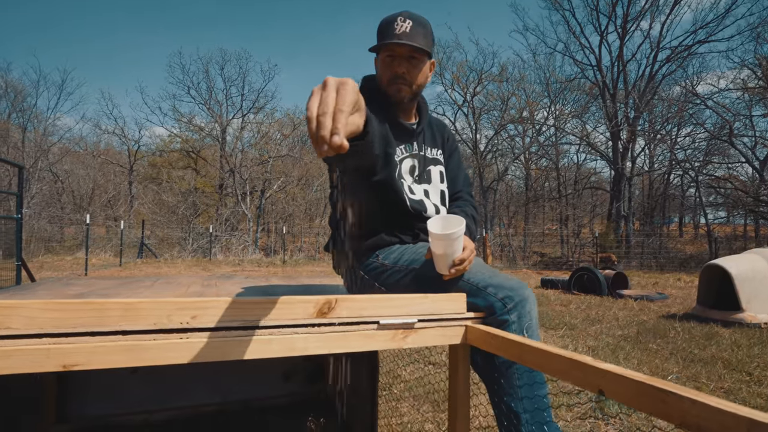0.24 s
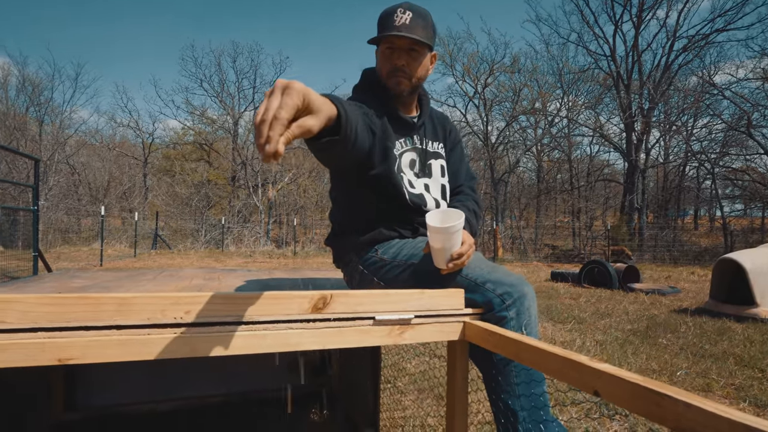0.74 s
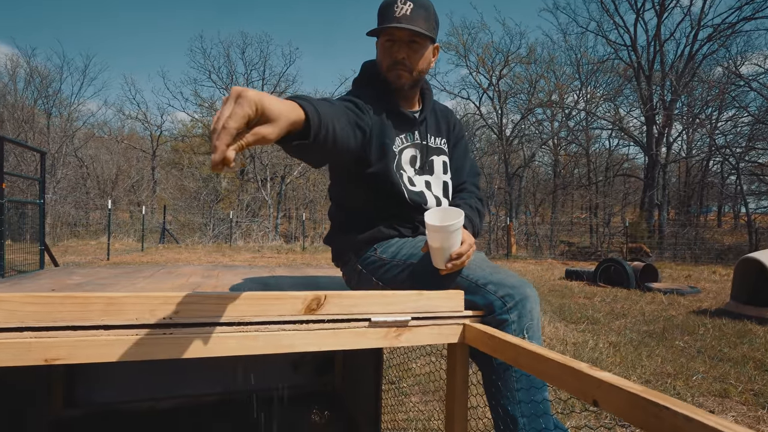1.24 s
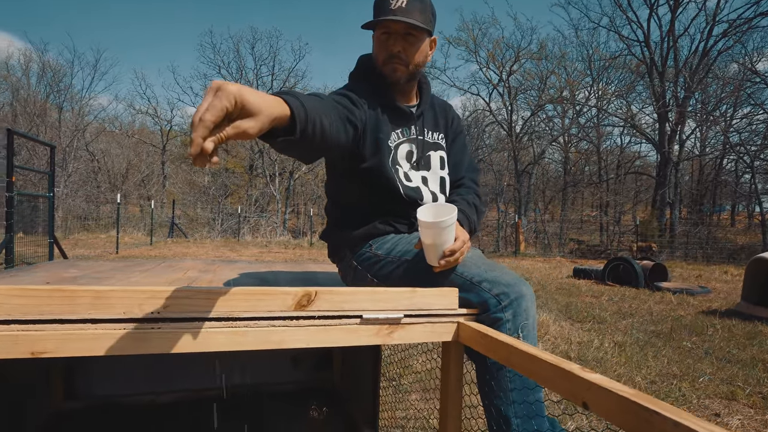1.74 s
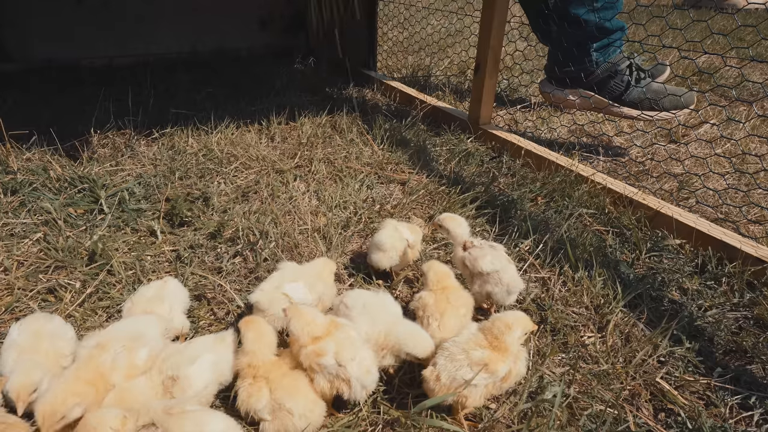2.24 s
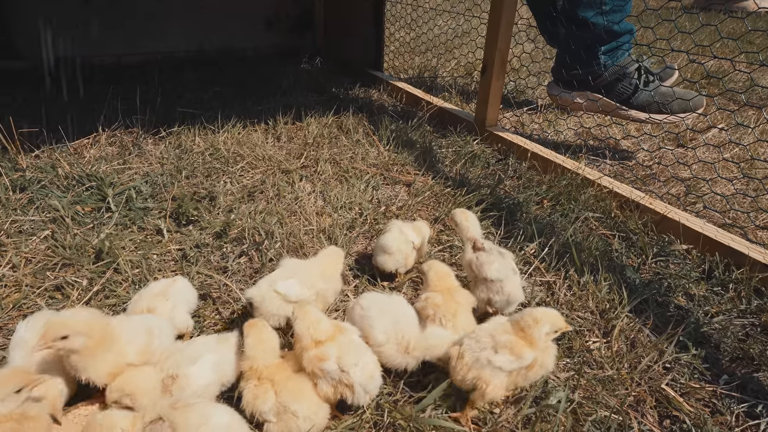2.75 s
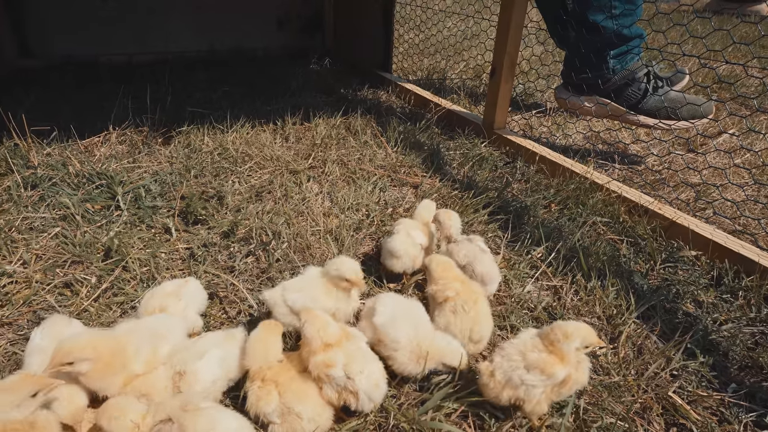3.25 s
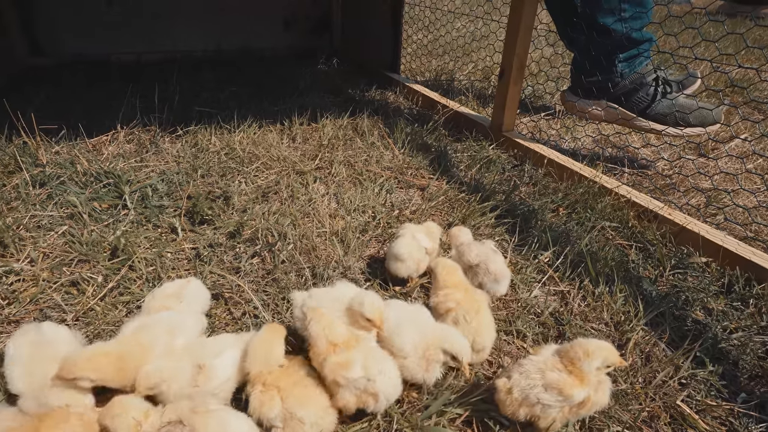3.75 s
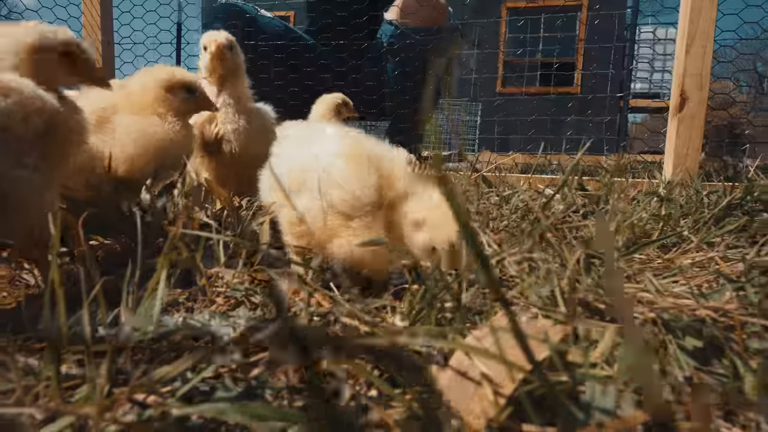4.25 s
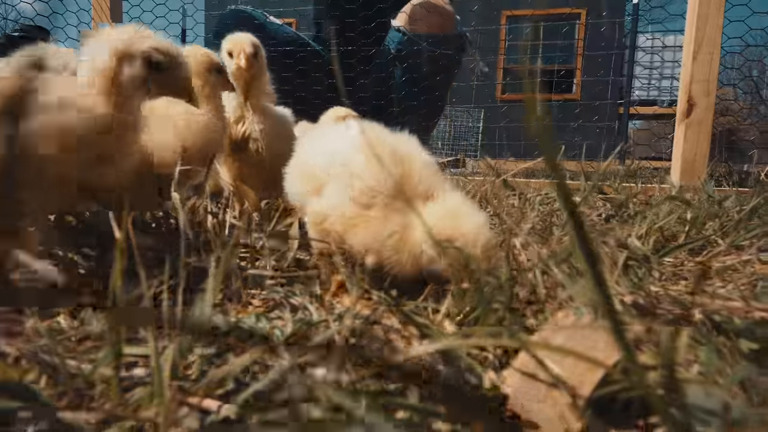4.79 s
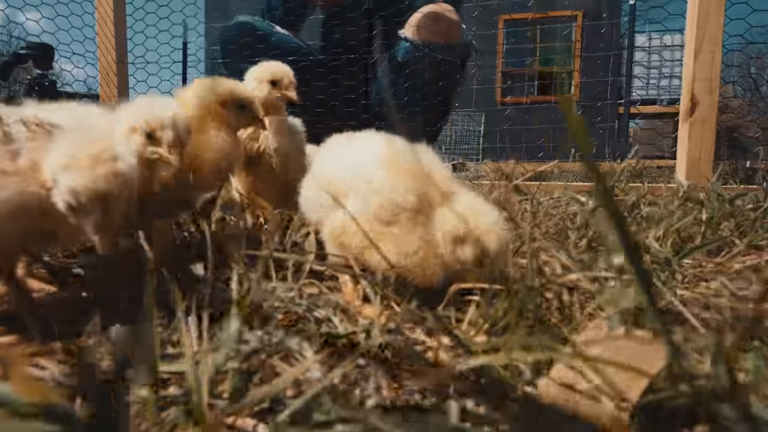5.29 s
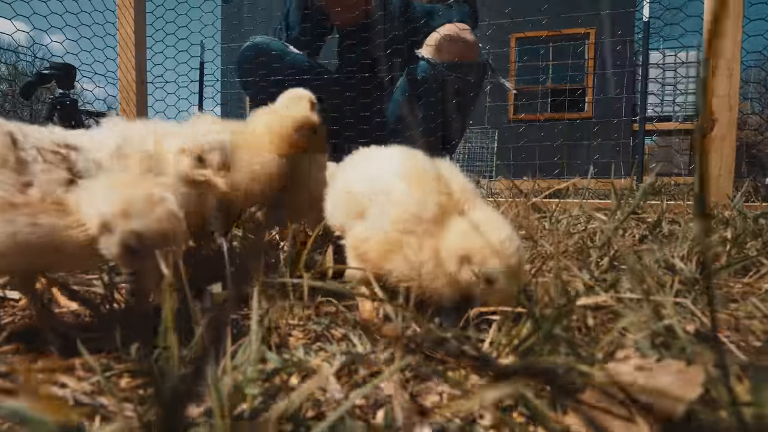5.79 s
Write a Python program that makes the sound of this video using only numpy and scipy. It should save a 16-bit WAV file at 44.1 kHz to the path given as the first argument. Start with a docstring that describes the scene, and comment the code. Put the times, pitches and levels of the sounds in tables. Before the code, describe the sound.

Outdoors, in one channel, low wind sways and buffets the microphone over soft open-air hiss and faint dry-grass rustle. From 0 to 2 s, chicks call quietly and sparsely, with very short, nearly pure whistles around 2.5 to 4 kHz; tiny feed grains ping off the pen, and a dull bump comes near 0.15 s. Thin, distant bird whistles waver faintly between about 1.8 and 3.9 s. A low click falls near 2.26 s, then wind swells until 3 s as louder cheeps overlap, sliding downward among arched peeps. More grains tick, the brightest near 3.4 s, with a small bump. Wind rises again around 3.6 s. A brief gritty hiss swells at 3.84 s and stops abruptly at 3.97 s. Afterward the wind mostly eases, peeps are close and strong, and grass rustles nearer, with dry pecks and stalk snaps thickest around 5.45 to 5.9 s. Peeping continues almost to the end at about 6 s.

```python
"""Chicks peep and wind buffets the microphone from the outset, over dry grass that rustles underfoot.
Each call is a nearly pure whistle, from a model of the syrinx, that arches or slides down in pitch.
Feed grains ping off the pen as decaying modes, among damped bumps and one low click; a whistle wavers far off.
A short rush of shaped noise leads to close pecks and snapping stalks, made of very brief noise bursts."""
import sys
import numpy as np
from scipy import signal
from scipy.fft import rfft, irfft, next_fast_len
from scipy.io import wavfile
from scipy.ndimage import uniform_filter1d

SR = 44100
rng = np.random.default_rng(int(sys.argv[2]) if len(sys.argv) > 2 else 0)


def put_to_file(sound):
    """Save the sound as 16-bit audio at rate SR, in the file named by the first command-line argument."""
    columns = np.atleast_2d(sound).T  # one column per channel
    safe = np.clip(columns, -1, 1)
    whole_steps = np.round(safe * 32767)
    wavfile.write(sys.argv[1], SR, whole_steps.astype(np.int16))


N = 265614  # length in samples
TIME = np.arange(N) / SR


def undb(db):
    """Logarithmic level: decibels become an amplitude ratio."""
    return 10 ** (np.asarray(db) / 20)


def unit(x):
    """Normalisation by effective value: scale to rms 1."""
    return x / np.sqrt(np.mean(x ** 2))


def curve(points):
    """Linear interpolation: (s, value) points joined by straight lines in time."""
    return np.interp(TIME, *np.transpose(points))


def colour(x, points):
    """Spectral shaping: weight the spectrum of x by (Hz, dB) points on a log frequency axis, at rms 1."""
    hz, db = np.transpose(points)
    size = next_fast_len(len(x))
    bins = np.maximum(np.fft.rfftfreq(size, 1 / SR), 1)
    gain = undb(np.interp(np.log(bins), np.log(hz), db))
    return unit(irfft(rfft(x, size) * gain, size)[:len(x)])


def band(x, lo_hz, hi_hz):
    """Band limitation: a causal Butterworth band-pass."""
    b, a = signal.butter(2, [lo_hz, hi_hz], "band", fs=SR)
    return signal.lfilter(b, a, x)


def walk(size, rate):
    """Random modulation: chance values, drawn rate times a second, smoothed to a spread a little below 1."""
    hold = max(int(SR / rate), 1)
    steps = np.repeat(rng.standard_normal(size // hold + 1), hold)
    return uniform_filter1d(uniform_filter1d(steps, hold), hold)[:size]


def add(out, start, x):
    """Superposition: mix x into out from start seconds on."""
    i = int(start * SR)
    out[i:i + len(x)] += x[:N - i]


def span(length_s):
    """Sampling: the sample times of one call, in seconds from its start."""
    return np.arange(0, length_s, 1 / SR)


def crackle(rate, smear_s, spread_db):
    """Impulsive noise: tiny cracks of very unequal size, in flurries, each a decaying burst of noise."""
    sizes = undb(spread_db * np.minimum(rng.standard_exponential(N), 4))
    chance = rate / SR * undb(4 * walk(N, 25))  # the flurries
    cracks = (rng.random(N) < chance) * sizes
    envelope = signal.lfilter([1], [1, -np.exp(-1 / (smear_s * SR))], cracks)
    return envelope * rng.standard_normal(N)


def ring(t, hz, t60):
    """Damped vibration: one struck mode that falls by 60 dB in t60 seconds."""
    return np.cos(2 * np.pi * hz * t) * np.exp(-np.log(1000) * t / t60)


# relative strength of the wind on the microphone: start_s [s], level_db [dB]
WIND_STRENGTH = [(0, -34.5), (0.4, -45), (0.72, -40.5), (1.45, -39.5), (1.6, -41), (2.22, -44),
                 (2.3, -31.5), (2.9, -30.5), (3.1, -39.5), (3.45, -41), (3.55, -30.5), (3.96, -29),
                 (4.04, -33.5), (4.25, -47.5), (4.75, -41.5), (5.35, -51.5), (5.7, -44.5), (5.85, -34.5)]
# spectrum of the slow sway: frequency_hz [Hz], level_db [dB]
SWAY_SPECTRUM = [(3, -10.5), (9, 6), (14, 3.5), (25, -10), (45, -16.5), (70, -35), (140, -66), (3000, -110)]
# spectrum of the gusts' buffeting: frequency_hz [Hz], level_db [dB]
BUFFET_SPECTRUM = [(25, -15), (55, 4.5), (80, 1.5), (125, -5.5), (200, -9), (320, -24.5), (700, -32),
                   (2000, -46), (10000, -82)]
# spectrum of the open air: frequency_hz [Hz], level_db [dB]
AIR_SPECTRUM = [(100, -2), (300, 4), (600, 0.5), (1200, -3), (2500, -12.5), (5000, -17), (8500, -13),
                (11000, -23.5), (16000, -28)]


def wind(sway_db=7, sway_growth=0.61, buffet_db=3.5, flutter_db=3.0, air_db=-46):
    """Turbulent pressure: eddies sway the microphone and gusts buffet it with the wind, over a soft air hiss."""
    strength_db = curve(WIND_STRENGTH)
    sway = colour(rng.standard_normal(N), SWAY_SPECTRUM)
    sway /= np.sqrt(uniform_filter1d(sway ** 2, SR // 5))  # eddies follow each other without long lulls
    sway *= undb(sway_growth * strength_db + sway_db)  # sway_growth in dB per dB of wind
    buffet = colour(rng.standard_normal(N), BUFFET_SPECTRUM) * undb(flutter_db * walk(N, 30))
    buffet *= undb(strength_db + buffet_db)
    air = colour(rng.standard_normal(N), AIR_SPECTRUM) * undb(air_db + walk(N, 12))
    return sway + buffet + air


# relative strength of the rustle, first a few steps away, then close by: start_s [s], level_db [dB]
RUSTLE_STRENGTH = [(0, -53.5), (0.35, -63.5), (0.8, -59.5), (1.2, -63.5), (2.2, -59), (2.3, -55),
                   (2.9, -52.5), (3.1, -56), (3.7, -61.5), (4.0, -58), (4.3, -54), (4.7, -48.5), (5.1, -48),
                   (5.35, -50.5), (5.5, -43.5), (5.8, -43.5), (5.92, -53), (6.02, -66)]
# spectrum of the grass blades and hiss: frequency_hz [Hz], level_db [dB]
RUSTLE_SPECTRUM = [(300, -27), (1200, 1.5), (2500, 8.5), (4500, 5.5), (8500, 6.5), (10500, 0), (13500, 0.5),
                   (16000, -6)]


def grass(blades_db=9.0, stalks_db=-4, hiss_db=-1):
    """Superposed impulses: under many small feet, blades tick brightly and stalks crunch lower, over a hiss."""
    blades = colour(crackle(rate=1400, smear_s=0.00081, spread_db=8), RUSTLE_SPECTRUM)
    stalks = unit(band(crackle(rate=150, smear_s=0.00074, spread_db=5.5), lo_hz=710, hi_hz=4430))
    hiss = colour(rng.standard_normal(N), RUSTLE_SPECTRUM)
    rustle = undb(blades_db) * blades + undb(stalks_db) * stalks + undb(hiss_db) * hiss
    return rustle * undb(curve(RUSTLE_STRENGTH))


def syrinx(hz, loudest, db, third_db, overtone_db, brightening,
           shimmer_db=1, throat_hz=3000, throat_width_hz=1500):
    """Source and resonator: a puff of air whistles through the throat; overtones grow with pressure and pitch.

    loudest is the share of the call before peak pressure; brightening is in dB of overtones per dB of level."""
    size = len(hz)
    puff = np.interp(np.linspace(0, 1, size), [0, loudest, 1], [0, 1, 0])
    pressure = np.sin(np.pi / 2 * puff)
    swell = pressure / np.hypot(1, 2 * (hz - throat_hz) / throat_width_hz)  # throat resonance
    phase = 2 * np.pi * np.cumsum(hz * (1 + .005 * walk(size, 700))) / SR  # slight pitch jitter
    overtones = np.sin(2 * phase) + undb(third_db) * np.sin(3 * phase)
    overtones *= (hz / hz.mean()) ** 2
    tone = np.sin(phase) + undb(overtone_db + brightening * (db + 22.5)) * pressure * overtones
    level = np.sqrt(2) * undb(db + shimmer_db * walk(size, 423))
    return level * swell / swell.max() * tone


# falling cheeps: start_s [s], length_s [s], start_hz [Hz], end_hz [Hz], level_db [dB],
# dwell on the opening note [exponent: 1 = plain cosine glide with a gentle start, more = later]
CHEEP_CALLS = [(0.005, 0.062, 3006, 2948, -27.5, 1), (0.985, 0.046, 2900, 2824, -29, 1.29),
               (1.133, 0.054, 3230, 2730, -26, 1.46), (2.015, 0.053, 3100, 2450, -33.5, 0.92),
               (2.334, 0.039, 3070, 2485, -23.5, 0.79), (2.608, 0.032, 3400, 3260, -28.5, 0.81),
               (2.614, 0.05, 3140, 2730, -19, 1.08), (2.692, 0.045, 2976, 2330, -18, 0.92),
               (2.841, 0.058, 3000, 2370, -18.5, 0.85), (2.991, 0.05, 3100, 2540, -22, 0.85),
               (3.115, 0.039, 3580, 3130, -31.5, 0.8), (3.113, 0.058, 3166, 2590, -21.0, 1.12),
               (3.295, 0.06, 3280, 2645, -18.5, 0.76), (3.366, 0.066, 3420, 2440, -19.5, 0.89),
               (3.486, 0.065, 3710, 2500, -16, 0.86), (3.557, 0.055, 3030, 2600, -22, 1.03),
               (3.622, 0.059, 3660, 2580, -17.5, 0.78), (3.679, 0.051, 3104, 2740, -19.5, 1.4),
               (3.738, 0.041, 3240, 3005, -23.5, 0.78), (4.029, 0.057, 3160, 2540, -27.5, 0.897),
               (4.093, 0.09, 3700, 2935, -24.5, 0.78), (4.143, 0.065, 4100, 2600, -28, 0.76),
               (4.382, 0.1, 3720, 3280, -33.8, 0.76), (4.71, 0.051, 3460, 2510, -24, 0.88),
               (4.975, 0.052, 3250, 2600, -29.5, 0.76), (5.084, 0.082, 4040, 2540, -26, 0.63),
               (5.271, 0.075, 4130, 2550, -24.5, 1), (5.853, 0.064, 3405, 2530, -22.5, 0.86),
               (5.944, 0.048, 3380, 2610, -18, 0.75)]


def cheeps():
    """Falling frequency glide: a cheep dwells on its opening note, then only slides down."""
    out = np.zeros(N)
    for start, length_s, start_hz, end_hz, db, dwell in CHEEP_CALLS:
        slide = 1 - np.cos(3 / 4 * np.pi * (span(length_s) / length_s) ** dwell)
        hz = start_hz + (end_hz - start_hz) * slide / slide[-1]
        add(out, start, syrinx(hz, loudest=0.45, db=db, third_db=-6.0, overtone_db=-27.0, brightening=0.29))
    return out


# arching peeps: start_s [s], rise_s [s], start_hz [Hz], crest_hz [Hz], level_db [dB],
# dwell on the opening note [exponent: 1 = plain cosine glide with a gentle start, more = later]
PEEP_CALLS = [(0.02, 0.061, 3010, 3550, -37.5, 3.3), (0.231, 0.034, 3030, 3570, -36.5, 1.81),
              (0.246, 0.025, 2580, 3480, -32, 1), (0.429, 0.02, 2050, 2860, -36.5, 0.89),
              (0.491, 0.034, 2710, 3720, -33, 1.8), (0.96, 0.045, 2604, 3860, -35, 2.6),
              (1.201, 0.032, 2910, 3500, -28, 1.6), (1.262, 0.038, 2460, 3900, -28, 1.34),
              (1.273, 0.057, 2140, 3500, -32, 1.64), (1.308, 0.025, 2997, 3470, -34.2, 0.6),
              (1.333, 0.036, 2640, 3580, -28.5, 2), (1.595, 0.059, 2210, 4060, -27.5, 1.9),
              (1.617, 0.027, 2710, 3310, -30, 1.1), (1.644, 0.029, 2355, 3700, -32.2, 0.79),
              (1.779, 0.037, 2810, 3710, -25, 2.15), (2.058, 0.032, 2350, 3760, -29, 1.44),
              (2.164, 0.059, 2545, 4000, -23, 2.95), (2.173, 0.027, 3770, 4430, -25.5, 0.51),
              (2.204, 0.028, 3980, 4470, -21, 0.6), (2.835, 0.033, 2524, 3760, -21, 1.1),
              (2.855, 0.016, 3500, 4120, -29, 0.73), (2.919, 0.056, 2690, 3860, -29.5, 1.2),
              (3.019, 0.04, 2960, 4070, -21.8, 1.23), (3.42, 0.023, 2460, 3140, -28, 1.05),
              (3.523, 0.043, 2970, 3400, -23, 2.02), (3.569, 0.028, 2660, 3610, -30, 1.26),
              (3.744, 0.043, 2780, 3960, -21.0, 1.5), (3.763, 0.039, 2760, 3720, -22, 1.8),
              (3.916, 0.042, 2810, 3570, -20, 1.8), (4.043, 0.041, 2902, 3510, -15.8, 2.3),
              (4.11, 0.039, 2890, 3790, -23, 2.09), (4.261, 0.039, 2330, 4100, -37.5, 1.2),
              (4.344, 0.036, 2944, 3760, -22.5, 4.1), (4.409, 0.05, 2923, 3610, -13.5, 1.5),
              (4.493, 0.038, 2440, 3640, -32.5, 0.85), (4.775, 0.047, 2826, 3715, -12.2, 1.73),
              (4.933, 0.045, 2850, 3910, -20, 3), (5.006, 0.037, 3060, 3494, -13, 1.65),
              (5.468, 0.042, 3160, 3510, -20.5, 1.42), (5.469, 0.041, 2590, 3478, -17.5, 1.9),
              (5.692, 0.024, 2340, 3850, -32, 1.5), (5.72, 0.022, 2720, 3250, -20, 0.97),
              (5.732, 0.044, 2660, 3870, -20.5, 1.75), (5.762, 0.049, 2910, 4260, -36, 1.7),
              (5.846, 0.027, 2760, 3600, -21, 1.56)]


def peeps(drop_s=0.016, drop_hz=600):
    """Arched frequency glide: a peep dwells, climbs to a crest and drops as the air gives out."""
    out = np.zeros(N)
    for start, rise_s, start_hz, crest_hz, db, dwell in PEEP_CALLS:
        t = span(rise_s + drop_s)
        rise = np.sin(np.pi / 2 * np.interp(t, [0, rise_s], [0, 1]) ** dwell) ** 2
        drop = 1 - np.cos(np.pi / 2 * np.interp(t - rise_s, [0, drop_s], [0, 1]))
        hz = start_hz + (crest_hz - start_hz) * rise - drop_hz * drop
        add(out, start, syrinx(hz, loudest=0.43, db=db, third_db=-13, overtone_db=-29.0, brightening=0.96))
    return out


# feed grains that hit the pen: start_s [s], pitch_hz of the lower mode [Hz], relative level_db [dB]
GRAIN_HITS = [(0.0545, 6980, -24), (.1037, 4530, -29.5), (0.51, 6200, -28), (.803, 8100, -21),
              (0.894, 6860, -27), (1.0045, 3600, -21), (1.0564, 8350, -27), (1.217, 8200, -18),
              (1.387, 7700, -27), (1.4753, 5850, -22.5), (1.8666, 8160, -15), (1.8985, 3880, -17.5),
              (2.9561, 3670, -22), (3.2384, 6370, -23.5), (3.369, 3960, -21), (3.4026, 6200, -12)]


def grains(t60=0.0073, upper=1.22, upper_db=-7, tick_db=-5, tick_s=0.0023,
           bounce_s=0.0066, bounce_db=-15, gain_db=-3):
    """Impact excitation: a hard grain ticks, rings in two modes (upper = pitch ratio) and bounces once."""
    out, t = np.zeros(N), np.arange(SR // 20) / SR
    for start, hz, db in GRAIN_HITS:
        tick = undb(tick_db) * rng.standard_normal(len(t)) * np.exp(-t / tick_s)
        ping = ring(t, hz, t60) + undb(upper_db) * ring(t, upper * hz, t60) + tick
        add(out, start, undb(db + gain_db) * ping)
        add(out, start + bounce_s * rng.uniform(0.47, 1.5), undb(db + bounce_db) * ping)
    return band(out, lo_hz=1150, hi_hz=9800)


def pen(x, first_s=0.0041, t60=0.051, echo_db=-17):
    """Reverberation: short, dense reflections from the boards of the pen fray the edges of each sound."""
    t = np.arange(SR // 5) / SR
    echoes = rng.standard_normal(len(t)) * (t > first_s) * np.exp(-np.log(1000) * t / t60)
    echoes /= np.sqrt(np.sum(echoes ** 2))
    return x + undb(echo_db) * signal.fftconvolve(x, echoes)[:N]


# dull bumps, and one low click (at 2.2595 s): start_s [s], pitch_hz [Hz], relative level_db [dB], t60_s [s]
BUMPS_AND_CLICK = [(.147, 127, -15, 0.06), (1.0044, 1700, -19.5, 0.0089), (1.277, 670, -28.5, 0.021),
                   (1.551, 920, -33, 0.032), (2.2595, 21.8, -8, 0.067), (2.658, 559, -31, 0.088),
                   (2.689, 756, -29, 0.038), (3.379, 490, -20.5, 0.028), (3.4017, 1330, -18.5, 0.0085)]


def bumps_and_click(soft_s=0.0038, scuff_db=-6):
    """Damped resonance: bumps and a low click ring amid noise; a thud builds up over part of a cycle."""
    out, t = np.zeros(N), np.arange(SR // 5) / SR
    for start, hz, db, t60 in BUMPS_AND_CLICK:
        noise = band(rng.standard_normal(len(t)), lo_hz=hz / 2 + 20, hi_hz=2 * hz + 30)
        scuff = unit(noise) * ring(t, 0, t60)  # at 0 Hz the ring is a bare decay
        thud = 50 < hz < 300  # the click, lower still, starts at once
        onset = 2 * (1 - np.exp(-t / soft_s)) ** 2 if thud else 1
        add(out, start, undb(db) * onset * (ring(t, hz, t60) + undb(scuff_db) * scuff))
    return out


# far thin whistles: start_s [s], end_s [s], start_hz [Hz], end_hz [Hz], level_db [dB]
FAR_WHISTLES = [(1.755, 2.116, 6580, 6620, -48.5), (1.9, 2.038, 8150, 7450, -57),
                (2.094, 2.226, 6600, 7900, -51.5), (2.36, 2.572, 7400, 7330, -56),
                (2.113, 2.22, 6240, 6200, -51), (2.89, 3.026, 6730, 6640, -51),
                (2.988, 3.375, 6450, 6400, -54.5), (3.74, 3.853, 6540, 6750, -51)]


def far_bird(waver=0.022, flicker_db=3):
    """Frequency modulation: a songbird in the trees gives thin whistles with a random waver (pitch share)."""
    out = np.zeros(N)
    for start, end, start_hz, end_hz, db in FAR_WHISTLES:
        size = len(np.arange(start, end, 1 / SR))
        hz = np.linspace(start_hz, end_hz, size) * (1 + waver * walk(size, 900))
        swell = signal.windows.tukey(size, .5) * undb(db + flicker_db * walk(size, 83))
        add(out, start, np.sqrt(2) * swell * np.sin(2 * np.pi * np.cumsum(hz) / SR))
    return out


# a short rush of hiss: start_s [s], end_s [s], relative level_db [dB]
RUSH_SPAN = (3.838, 3.97, -24)
# spectrum of the rush: frequency_hz [Hz], level_db [dB]
RUSH_SPECTRUM = [(300, -8), (900, -4.5), (1300, 3), (1800, -3.5), (3000, -2.5), (4300, -7), (5200, -4),
                 (7200, 3), (9200, -10.5), (10500, -18), (16000, -22)]


def rush(attack_s=0.037, release_s=0.0058, flutter_db=1.5, grit_db=-3, gain_db=-3.0):
    """Amplitude envelope on shaped noise: a brief gritty hiss that swells and ends abruptly."""
    start, end, db = RUSH_SPAN
    swell = np.clip(np.minimum((TIME - start) / attack_s, (end - TIME) / release_s), 0, 1)
    grit = undb(grit_db) * unit(crackle(rate=3700, smear_s=0.00036, spread_db=4))
    hiss = colour(rng.standard_normal(N) + grit, RUSH_SPECTRUM)
    return swell * hiss * undb(db + gain_db + flutter_db * walk(N, 170))


# pecks and snapping stalks: start_s [s], then relative levels crack_db [dB], low knock_db [dB],
# high edge_db [dB]
STALK_SNAPS = [(4.0078, -3, -25.5, -30), (4.098, -6.5, -33, -28), (4.3449, -11, -29, -41),
               (4.387, -17, -34, -48), (4.538, -10.5, -32, -39), (4.6796, -9.5, -28.5, -32),
               (4.7055, -3.5, -28.5, -30), (4.714, -3.5, -24, -32), (4.783, -6, -26.5, -42),
               (4.9427, -10, -35.5, -34), (5.217, -12, -24, -31), (5.4499, -6.5, -24, -28),
               (5.4874, -7.5, -25.5, -34), (5.4937, 1.5, -21.5, -24), (5.5447, -8.5, -28, -34),
               (5.5767, 0, -34.5, -28), (5.5916, -7, -27.5, -29), (5.5983, -0.5, -30, -33),
               (5.605, -10, -35.5, -37), (5.6286, -5, -28, -32), (5.67, -15, -44, -37),
               (5.7133, -5.5, -26, -33), (5.757, -8.5, -40, -27), (5.7809, -4, -26.5, -34),
               (5.8745, -5.5, -26.5, -32), (5.8869, -11, -45, -35)]


def snaps(crack_s=0.00019, tail_s=0.0032, tail_db=-29, crack_db=-22.0, knock_db=-4.5, top_db=-4.5):
    """Brittle fracture: a beak or foot breaks a dry stalk with a very short crack, then the grass shivers."""
    out, t = np.zeros(N), np.arange(SR // 50) / SR
    for start, db, body_db, edge_db in STALK_SNAPS:
        decay = np.exp(-t / crack_s) + undb(tail_db) * np.exp(-t / tail_s)
        push = rng.standard_normal(len(t)) * decay
        knock = undb(body_db + knock_db) * unit(band(push, lo_hz=1110, hi_hz=3400))
        crack = undb(db + crack_db) * unit(band(push, lo_hz=5040, hi_hz=9100))
        top = undb(edge_db + top_db) * unit(band(push, lo_hz=9800, hi_hz=14500))
        add(out, start, knock + crack + top)
    return out


def scene():
    """Superposition of sources: chicks and feed sound in the pen; the snaps are so near that they arrive dry."""
    in_pen = pen(cheeps() + peeps() + grains())
    mix = wind() + grass() + in_pen + bumps_and_click() + far_bird() + rush() + snaps()
    return mix[None]  # one channel


def record(dry, top_hz=15900):
    """Overload and band limitation: the recorder clips at full scale, then cuts the top with a steep low-pass."""
    low_pass = signal.ellip(10, .2, 80, top_hz, fs=SR, output="sos")
    return signal.sosfilt(low_pass, np.clip(dry, -1, 1))


dry = scene()
out = record(dry)
put_to_file(out)
```